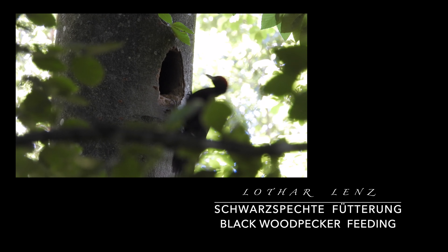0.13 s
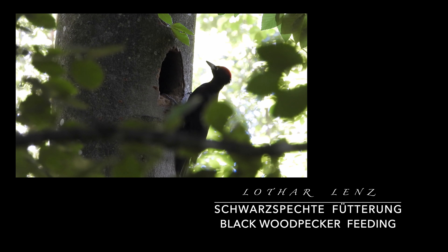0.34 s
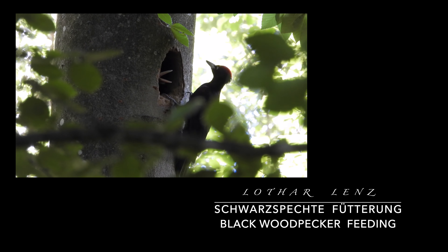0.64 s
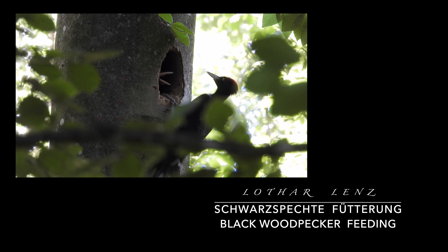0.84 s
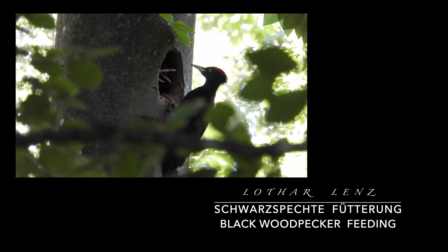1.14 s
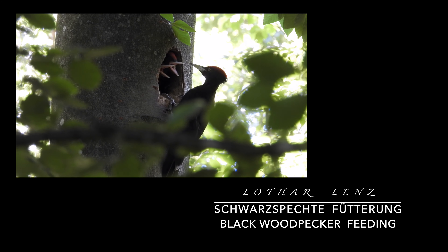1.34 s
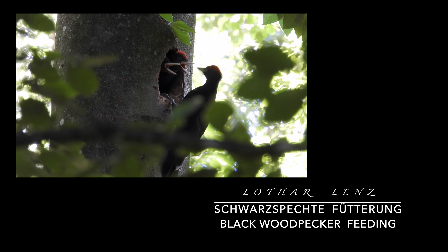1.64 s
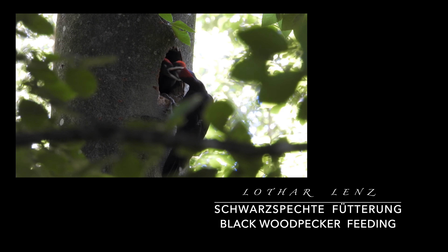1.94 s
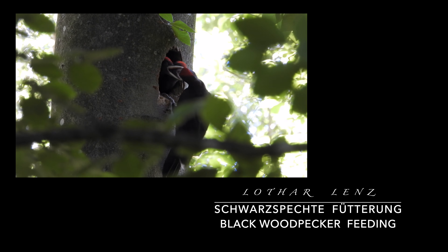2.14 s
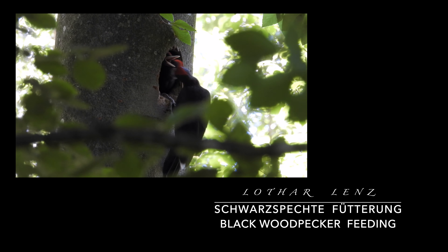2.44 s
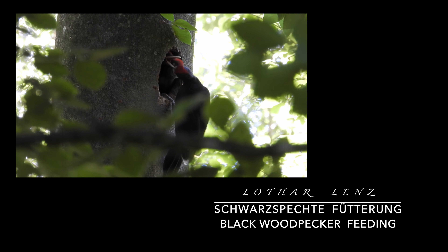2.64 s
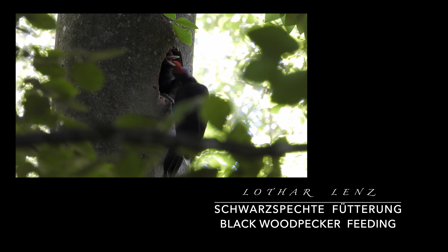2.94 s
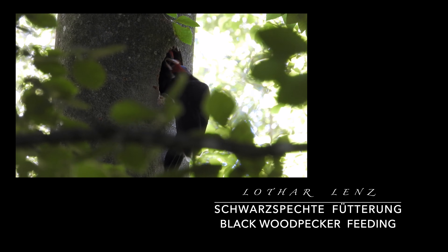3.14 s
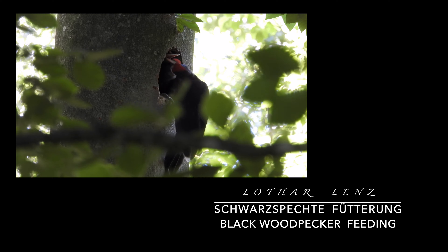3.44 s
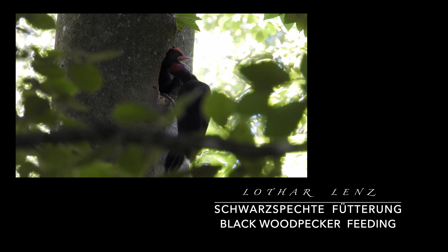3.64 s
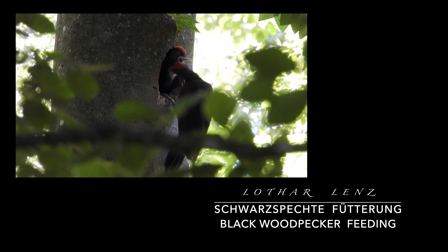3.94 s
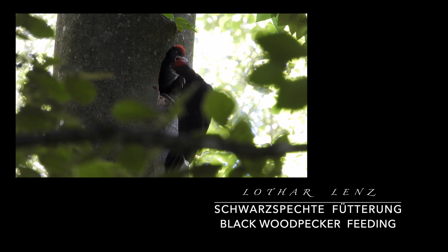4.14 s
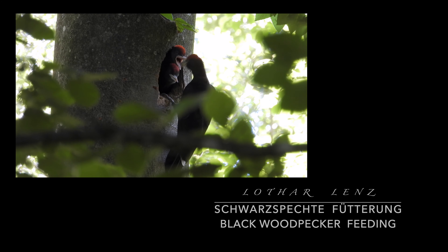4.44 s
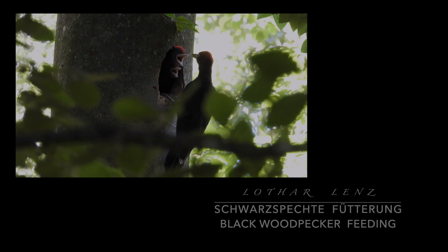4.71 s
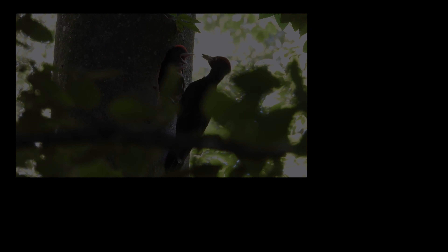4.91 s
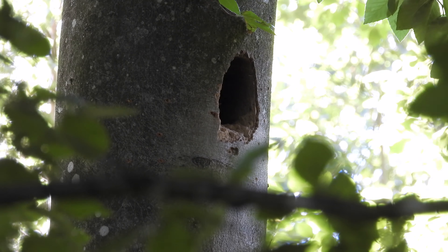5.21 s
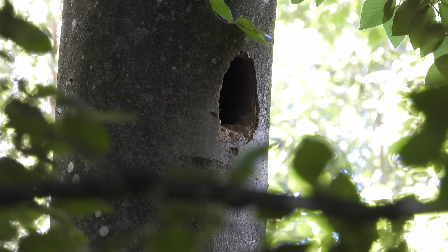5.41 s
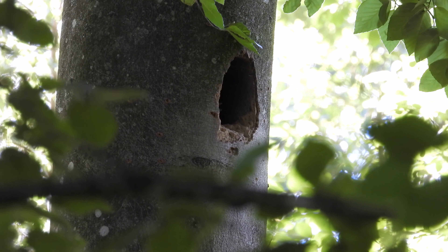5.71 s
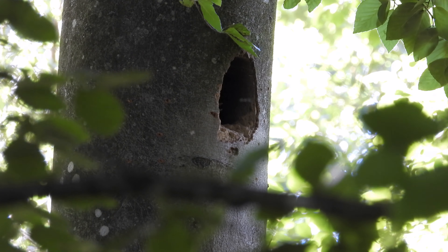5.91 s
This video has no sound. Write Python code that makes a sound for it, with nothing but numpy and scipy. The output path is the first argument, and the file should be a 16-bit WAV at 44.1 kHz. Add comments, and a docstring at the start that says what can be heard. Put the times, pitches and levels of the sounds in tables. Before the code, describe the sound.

Young woodpeckers in a tree hole beg in fast, even, raspy squeaking calls, then after a cut call only faintly from inside the trunk.

```python
"""Woodpecker nestlings beg from a hole in a beech, more than four calls a second, almost wholly on the right.
Each call slides up as a stack of harmonics, then breaks into a rasp of uneven pulses and noise; many hold a squeal.
The hollow trunk and the forest ring on as decaying filtered noise, over coloured noise for wind in the leaves.
Another bird adds soft whistles, gliding sines, and a thin trill, a narrow flickering band of noise.
After a cut the young call faintly from deep inside, over a little more hiss."""
import sys
import numpy as np
from scipy import signal
from scipy.fft import rfft, irfft
from scipy.io import wavfile

SR = 44100
rng = np.random.default_rng(int(sys.argv[2]) if len(sys.argv) > 2 else 0)


def wrap_up_sound(samples):
    """Save the sound to the file named by the first command line argument, as 16-bit audio."""
    columns = np.atleast_2d(samples).T
    # keep every value between -1 and 1, then stretch to whole-number steps
    tamed = np.clip(columns, -1, 1)
    steps = np.round(tamed * 32767).astype(np.int16)
    wavfile.write(sys.argv[1], SR, steps)


N = 267466
TIME = np.arange(N) / SR  # s
FREQ = np.maximum(np.arange(N // 2 + 1) * SR / N, 1)  # Hz
CUT_S = 5.095  # the view moves from the hole to the inside
ONSET_S = 0.04  # a glide fades in over this time ahead of its nominal start
TOP_HZ = 15700  # upper limit of the recorder


def undb(db):
    """Decibels to amplitude: 20 dB are a factor of ten."""
    return 10 ** (np.asarray(db) / 20)


def unit(x):
    """Normalise the root mean square, the measure of signal power, to 1."""
    return x / np.sqrt(np.mean(x ** 2) + 1e-20)


def colour(points, hz):
    """Spectral level in dB, interpolated along a logarithmic frequency axis."""
    f, db = np.transpose(points)
    return np.interp(np.log(np.maximum(hz, 1)), np.log(f), db)


def bell(x, centre, width):
    """Gaussian hump of height 1; the width is its standard deviation."""
    return np.exp(-0.5 * ((x - centre) / width) ** 2)


def wander(size, rate):
    """Band-limited random motion, spread about 1: straight lines between random knots, rate per second."""
    knots = rng.standard_normal(size)
    return 1.19 * np.interp(np.arange(size) * min(rate / SR, 1), np.arange(size), knots)


def noise(points):
    """Stationary noise, rms 1: white noise filtered to the given colour."""
    spectrum = rfft(rng.standard_normal(N))
    return unit(irfft(spectrum * undb(colour(points, FREQ)), N))


def add(track, start, sound):
    """Linear superposition: mix a sound into the track at a time in seconds."""
    i = int(start * SR)
    part = sound[max(-i, 0):max(N - i, 0)]
    track[max(i, 0):max(i, 0) + len(part)] += part


def read(curve, s):
    """Linear interpolation of a curve's columns at a time in seconds."""
    times, *columns = np.transpose(curve)
    return [np.interp(s, times, column) for column in columns]


def throat(source, gain_db):
    """Source-filter principle: bill and hole rim add random resonances and delay each pitch differently."""
    size = len(source) + 1024
    step = SR / size  # Hz per bin
    bins = np.arange(size // 2 + 1)

    def across(spacing_hz):
        knots = rng.standard_normal(len(bins))
        return 1.216 * np.interp(bins * step / spacing_hz, bins, knots)

    # the slope of the phase is the delay, scattered by about 1 ms
    phase = 2 * np.pi * step * np.cumsum(0.001074 * across(301.3))
    gain = undb(gain_db(bins * step) + 2.5 * across(261.5))
    return irfft(rfft(source, size) * gain * np.exp(1j * phase), size)[:len(source)]


def glide(start, end, hz, db, wheeze_db):
    """Rising air pressure lifts the pitch and level of a harmonic series; a wide gape adds turbulent wheeze."""
    # Spectrum of the voice. Each row: frequency in Hz, relative level in dB per Hz.
    voice_colour = [(400, -75), (1100, -50), (1700, -7.5), (2400, 4), (3200, 1.5), (4300, 4), (4900, -1.5),
                    (5600, -5.5), (7000, -0.5), (8500, -6.5), (10000, -20), (15000, -46)]
    # Air forced through the wide open bill. Each row: frequency in Hz, relative level in dB per Hz.
    wheeze_colour = [(400, -73), (1000, -32), (2400, -29.5), (4700, -15), (5300, -3.5), (5700, 1.5),
                     (6200, -9), (7200, -18), (8500, -18), (9600, -28), (15000, -52)]
    lead_s = 0.045  # the pitch passes hz this long before the end
    climb = 5.0  # rise of the pitch per second, as a share of hz
    swell_db_per_s = 150
    t = np.arange(-int(ONSET_S * SR), int((end - start + 0.02) * SR)) / SR
    size = len(t)
    since = t + start - (end - lead_s)
    unsteady = 1 + 0.01485 * wander(size, 260.0) + 0.03 * wander(size, 45.08)
    pitch = hz * np.maximum(1 + climb * since, 0.5) * unsteady
    phase = 2 * np.pi * np.cumsum(pitch) / SR

    voice = 0
    for k in range(1, 17):
        # high partials lose their phase soonest
        blur = 0.2 * k * hz / 3000 * wander(size, 750)
        partial = undb(4.6 * wander(size, 90)) * np.sin(k * phase + blur)
        voice = voice + partial * (k * pitch < TOP_HZ)
    breathy = unit(voice) + 0.16 * rng.standard_normal(size)
    voice = throat(breathy, lambda f: colour(voice_colour, f))
    wheeze = throat(rng.standard_normal(size), lambda f: colour(wheeze_colour, f))
    sound = unit(unit(voice) + undb(wheeze_db) * unit(wheeze))

    # two overlapping stages of opening
    opening = 0.54 * np.clip((t + ONSET_S) / ONSET_S, 0, 1) + 0.6 * np.clip(t / 0.019 + 0.66, 0, 1)
    closing = np.clip((end - start + 0.0017 - t) / 0.021, 0, 1)
    level_db = db - 2.0 + swell_db_per_s * np.minimum(since, 0.028) + 1.47 * wander(size, 91.4)
    return sound * opening * closing * undb(level_db)


def patchy(x, patchy_db, rate=110):
    """Independent amplitude modulation: each of many overlapping triangular bands flutters on its own."""
    spectrum = rfft(x)
    hz = np.arange(len(x) // 2 + 1) * SR / len(x)
    spacing_hz = 900
    total = 0
    for centre in np.arange(0, TOP_HZ, spacing_hz):
        band = irfft(spectrum * np.clip(1 - abs(hz - centre) / spacing_hz, 0, 1), len(x))
        total = total + band * undb(patchy_db * wander(len(x), rate))
    return total


def rasp(db, half, low_db, gape_db, treble_db,
         pulse_hz=560, scatter=0.09, air=0.42, dive=0.3, detune=0.07, sharpness=0.77):
    """Chaotic flapping of the syrinx: uneven pulses and turbulent air excite the throat and open bill."""
    # Spectrum of the rasp. Each row: frequency in Hz, relative level in dB per Hz.
    rasp_colour = [(400, -82.5), (900, -36), (1150, -24), (1450, -13.5), (1900, -7), (2500, -4), (3150, 2),
                   (3700, -2.5), (4250, 3.5), (4900, -4), (5700, 0), (8200, -11.5), (9700, -23),
                   (12500, -39.5), (15500, -53)]
    size = 8192
    t = (np.arange(size) - size // 2) / SR
    chance = rng.standard_normal((256, 2))  # one row a pulse: timing, level
    # the flapping speeds up to just before the climax and then dives
    rate = pulse_hz * (1 - dive + dive * bell(t, -0.006, 0.014)) * np.exp(detune * rng.standard_normal())
    cycles = np.cumsum(np.exp(scatter * chance[:, 0]))
    at = np.searchsorted(np.cumsum(rate) / SR, cycles)
    pulses = np.bincount(at, undb(2.76 * chance[:, 1]), size)[:size]
    envelope = bell(t, 0, half * sharpness)
    flutter = undb(1.27 * wander(size, 214.2))
    source = (unit(pulses) + air * rng.standard_normal(size)) * envelope * flutter

    def gain_db(f):
        shelf = treble_db * np.clip((f - 6300) / 1500, 0, 1)
        treble = shelf + (treble_db * 0.5 + 2.0) * bell(f, 12800, 1560)
        resonances = low_db * bell(f, 1750, 310) + gape_db * bell(f, 5360, 630)
        return colour(rasp_colour, f) + resonances + treble

    sound = throat(patchy(source, 3.5), gain_db)
    return unit(sound) * np.sqrt(np.mean(envelope ** 2)) * undb(db)


def note(half, hz, db, arch, waver):
    """Frequency modulation: a short unsteady sine whose pitch rises and falls in an arch."""
    t = np.arange(-int(3 * half * SR), int(3 * half * SR)) / SR
    pitch = hz * (1 - arch * (t / half) ** 2 + waver * wander(len(t), 557))
    flutter_db = 1.8 * wander(len(t), 120)
    tone = np.sin(2 * np.pi * np.cumsum(pitch) / SR)
    return np.sqrt(2) * undb(db + flutter_db) * bell(t, 0, half) * tone


def nestlings():
    """Nonlinear voice production: a harmonic glide gives way to chaos, at times with a locked tone."""
    # Begging calls. Each row: climax in seconds, rasp level in dB, rasp half length in seconds before sharpening.
    begs = [(0.132, -33, 0.03), (.35, -33, 0.021), (.558, -31.5, .026), (.752, -27, .015),
            (.797, -30, 0.022), (.985, -27, 0.035), (1.196, -27, 0.027), (1.388, -27, 0.038),
            (1.595, -22, 0.02), (1.802, -22.5, 0.015), (2.011, -22, .018), (2.229, -25.5, 0.018),
            (2.447, -23.5, .015), (2.664, -24, 0.012), (2.885, -24.5, 0.015), (3.104, -23.5, 0.015),
            (3.323, -24, .017), (3.541, -26.5, .016), (3.754, -29.5, 0.021), (3.974, -26, 0.018),
            (4.199, -27, 0.018), (4.408, -26.5, 0.019), (4.624, -24.5, 0.014), (4.84, -26, .016),
            (5.056, -25, .025), (5.257, -44, 0.023), (5.51, -45, 0.026), (5.768, -41.5, .02),
            (6.019, -42.5, 0.025)]
    # The bills on the whole open wider as the feeding goes on.
    # Each row: time in seconds, gape resonance in dB, wheeze against the voice in the glide in dB.
    gape = [(.13, -10, -9), (.75, -6, -11), (1.39, -2, -1.5), (2.3, -3, -2), (2.89, 6.5, 8), (3.75, 0, 12),
            (4.41, -2, 9), (4.84, 4, 22), (5.3, -0.5, 0), (6.0, -2, -6)]
    # The voice is fuller as the parent arrives and thins during feeding.
    # Each row: time in seconds, glide level against the rasp in dB before swell and trim, low resonance in dB.
    fullness = [(.35, -11.5, -7), (.75, -11.5, 2.5), (1.3, -7, 2.5), (1.8, -10.5, 8.5), (2.23, -11, 1),
                (2.45, -17, -2.5), (2.89, -14.5, 0), (3.7, -22, -5.5), (3.97, -15.5, -4),
                (5.05, -13.5, -2.5), (5.3, -6.5, -5), (5.8, -10, 10)]
    # Brightness of the rasp. Each row: time in seconds, treble level in dB.
    treble = [(.35, -1.5), (1.39, 4), (2.01, 1.5), (2.4, -4.5), (2.85, 4.5), (4.4, 3), (4.84, 8.5),
              (5.26, 3.5)]
    # The syrinx locks briefly on one tone. Each row: time in seconds, pitch in Hz, level in dB before a trim.
    squeals = [(.139, 3110, -34), (.141, 1565, -43), (.483, 3200, -37.5), (.573, 3290, -27.5),
               (.997, 3630, -21.5), (1.204, 3710, -21), (1.401, 3150, -26), (1.796, 3250, -27),
               (2.015, 3130, -28.5), (2.238, 3140, -25), (2.44, 4220, -27.5), (2.668, 4300, -24.5),
               (3.32, 3130, -26), (3.325, 1450, -37.5), (3.764, 4050, -31.5), (3.979, 3110, -26.5),
               (4.198, 3150, -29), (5.054, 1394, -42.5)]
    glide_hz, calm_glide_hz = 1061, 740  # pitch early in the glide, with and without the parent
    glide_lead_s, glide_gap_s = 0.068, 0.0046  # nominal start and end of a glide, ahead of the climax
    track = np.zeros(N)
    detunes = 1 + 0.03 * rng.standard_normal(len(begs))  # the pitch differs from call to call
    for (s, db, half), detune in zip(begs, detunes):
        gape_db, wheeze_db = read(gape, s)
        glide_db, low_db = read(fullness, s)
        treble_db, = read(treble, s)
        shape = db, half, low_db, gape_db, treble_db
        if s < CUT_S:
            hz = glide_hz
            sound = rasp(*shape)
        else:  # with the parent gone, the calls are calmer and steadier in pitch
            hz = calm_glide_hz
            sound = rasp(*shape, pulse_hz=985, scatter=0.025, air=0.3, dive=0.15, detune=0.015, sharpness=0.8)
        add(track, s - len(sound) / SR / 2, sound)
        start = s - glide_lead_s
        rise = glide(start, s - glide_gap_s, hz * detune, db + glide_db, wheeze_db)
        add(track, start - ONSET_S, rise)
    for s, hz, db in squeals:
        sound = note(0.0036, hz, db + 0.5, arch=0.0138, waver=0.026)
        add(track, s - len(sound) / SR / 2, sound)
    return track


def echoes(x, t60, delay, gain, db):
    """Diffuse reverberation: convolution with coloured noise that builds up and falls 60 dB in t60 seconds."""
    tail = rng.standard_normal(N) * undb(-60 * TIME / t60) * np.clip(TIME / delay - 0.3, 0, 1)
    tail = irfft(rfft(tail) * gain, N)[:SR]
    return signal.fftconvolve(x, tail / np.sqrt(np.sum(tail ** 2)))[:N] * undb(db)


def surroundings(x, hollow_db, trunks_db, forest_db):
    """Resonance and scattering: the nest hollow rings, nearby trunks scatter, the forest answers dully."""
    # Resonances of the nest hollow. Each row: frequency in Hz, bandwidth in Hz, relative level in dB.
    hollow_modes = [(2000, 930, 4.5), (3300, 260, 1), (3490, 420, 12.5), (4400, 570, 5), (6000, 940, -21)]
    modes = sum(undb(db) / (1 + 2j * (FREQ - hz) / width) for hz, width, db in hollow_modes)
    trunk_gain = undb(colour([(2000, -4), (4500, 1), (8000, 2.5), (13000, 1.5)], FREQ))
    forest_gain = undb(colour([(2000, 5.5), (5000, -1.5), (10000, -17)], FREQ))
    hollow = echoes(x, 0.29, 0.0086, modes, hollow_db)
    trunks = echoes(x, 0.15, 0.008, trunk_gain, trunks_db)
    forest = echoes(x, 1.0, 0.11, forest_gain, forest_db)
    return x + hollow + trunks + forest


def wind_in_leaves():
    """Incoherent sum of many small rustles: coloured noise that swells slightly, rms about 1."""
    # Spectrum of the leaves. Each row: frequency in Hz, relative level in dB per Hz.
    leaves_colour = [(30, -48), (60, -65), (100, -24), (140, -13.5), (270, -5), (500, -2), (750, 0.5),
                     (1100, -4), (2000, -6), (4000, -5.5), (8000, -15), (11000, -23), (15500, -31)]
    return noise(leaves_colour) * undb(0.7 * wander(N, 5.13))


def hiss():
    """Stationary random noise of a smooth broad spectrum, rms 1."""
    # Spectrum of the hiss. Each row: frequency in Hz, relative level in dB per Hz.
    hiss_colour = [(40, -39), (100, -14), (200, -6), (1000, -1.5), (7000, -2), (15000, -5)]
    return noise(hiss_colour)


def far_bird():
    """Tones and narrow-band noise: soft arched whistles and one thin high trill from elsewhere in the wood."""
    # Whistles. Each row: centre in seconds, half length in seconds, top pitch in Hz, level in dB before a trim.
    whistles = [(2.996, 0.017, 2416, -55.5), (5.172, .012, 2940, -50), (5.386, 0.051, 1960, -58.5),
                (5.655, 0.038, 2760, -53), (5.854, 0.015, 2950, -55.5)]
    band = noise([(8300, -43), (9000, -6), (9350, 6.0), (9900, -49)])
    trill = band * undb(1.5 * wander(N, 32))
    track = trill * bell(TIME, 4.05, 0.22) * undb(-63.5)
    for s, half, hz, db in whistles:
        add(track, s - 3 * half, note(half, hz, db - 2, arch=0.04, waver=0.02))
    return track


def scene():
    """Superposition in two shots of the same tree: the first fades out at the cut, the second fades in."""
    calls, whistles = nestlings(), far_bird()
    leaves = wind_in_leaves()
    at_hole = surroundings(calls * (TIME < CUT_S) + whistles, hollow_db=-19.0, trunks_db=-7.0, forest_db=-30)
    at_hole = at_hole + undb(-56.5) * leaves
    stir_db = 3.33 * bell(TIME - CUT_S, 0.4, 0.12)  # the leaves stir a little
    inside = surroundings(calls * (TIME > CUT_S) + whistles, hollow_db=-18, trunks_db=-4.0, forest_db=-27)
    inside = inside + undb(-57 + stir_db) * leaves + undb(-60.5) * hiss()
    fade_out = np.clip((CUT_S - TIME) / 0.032, 0, 1)
    fade_in = np.clip((TIME - CUT_S) / 0.14, 0, 1) ** 0.68
    right = at_hole * fade_out + inside * fade_in
    # the left channel carries only hiss and a trace of crosstalk
    left = undb(-67) * right + hiss() * (undb(-77) * fade_out + undb(-68) * fade_in)
    return np.array([left, right])


def record(dry):
    """Band limiting: the recorder removes the deepest bass and cuts the top."""
    thin = signal.sosfilt(signal.butter(2, 55, "high", fs=SR, output="sos"), dry)
    return signal.sosfilt(signal.ellip(10, 0.2, 70, TOP_HZ, fs=SR, output="sos"), thin)


dry = scene()
out = record(dry)
wrap_up_sound(out)
```